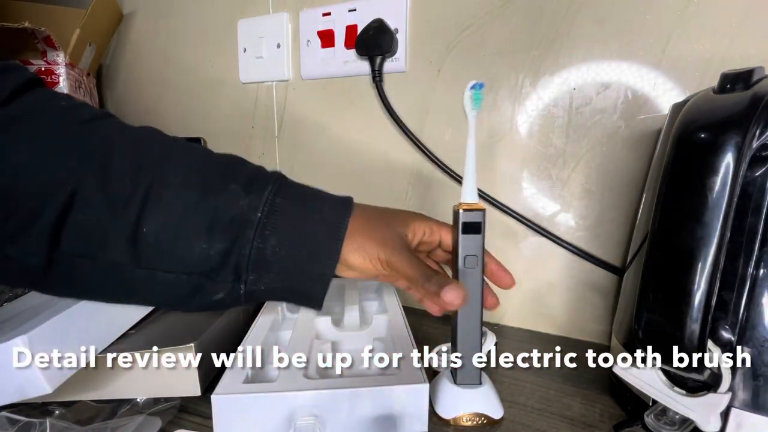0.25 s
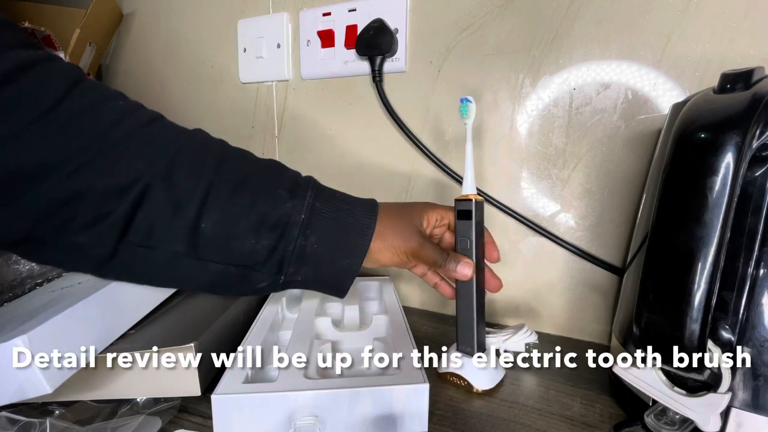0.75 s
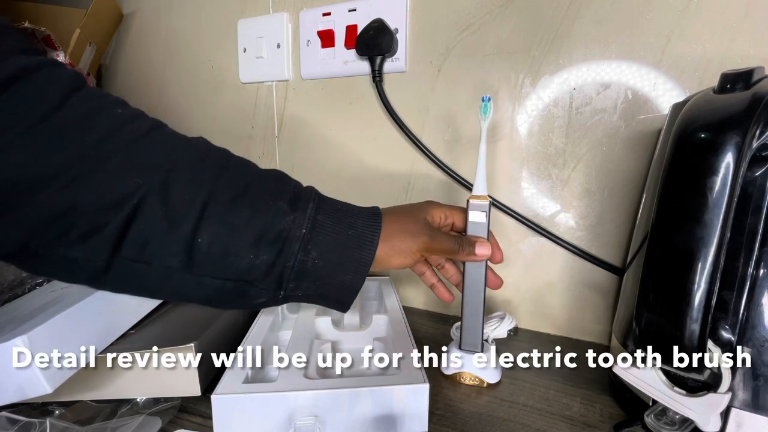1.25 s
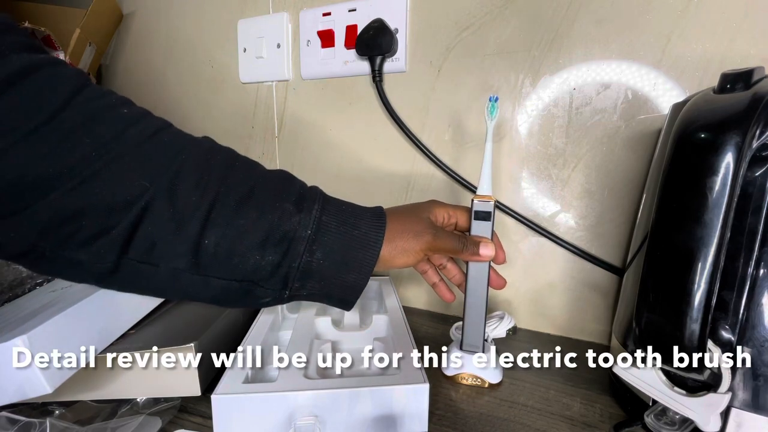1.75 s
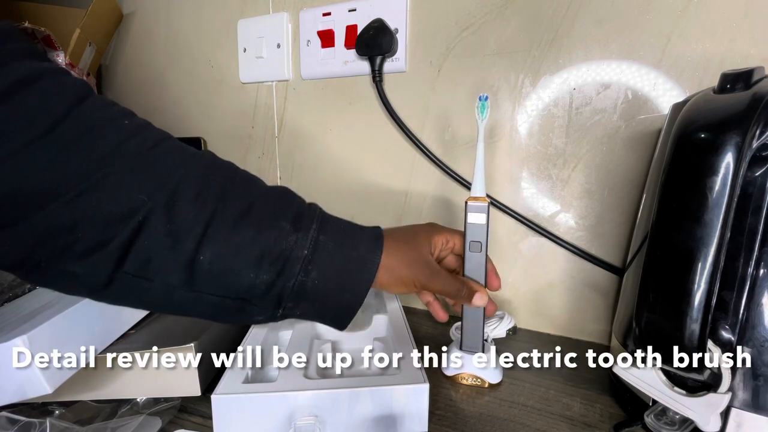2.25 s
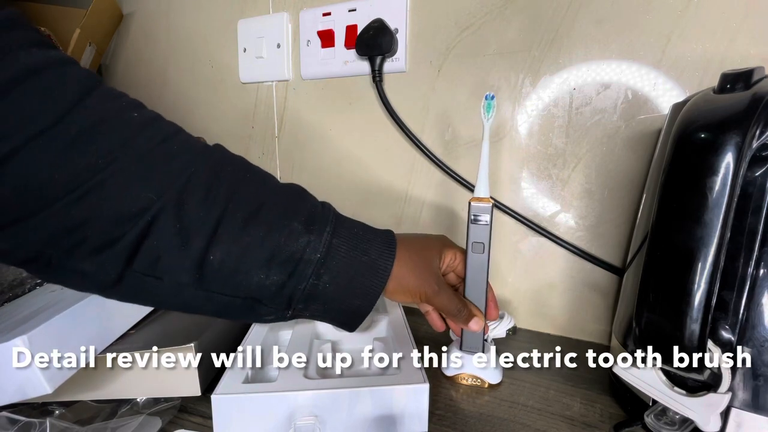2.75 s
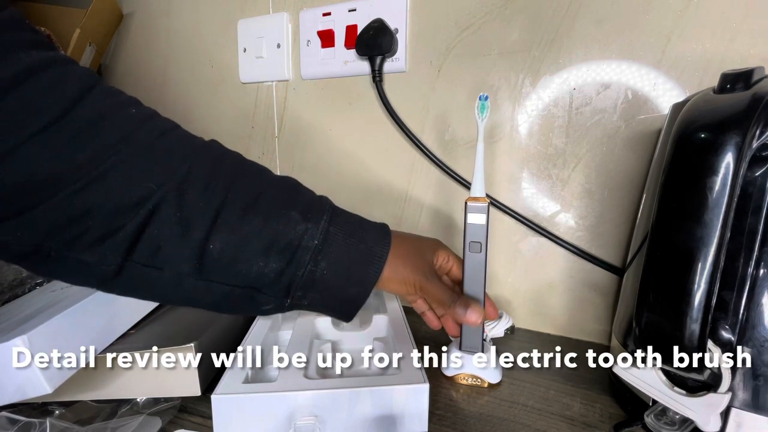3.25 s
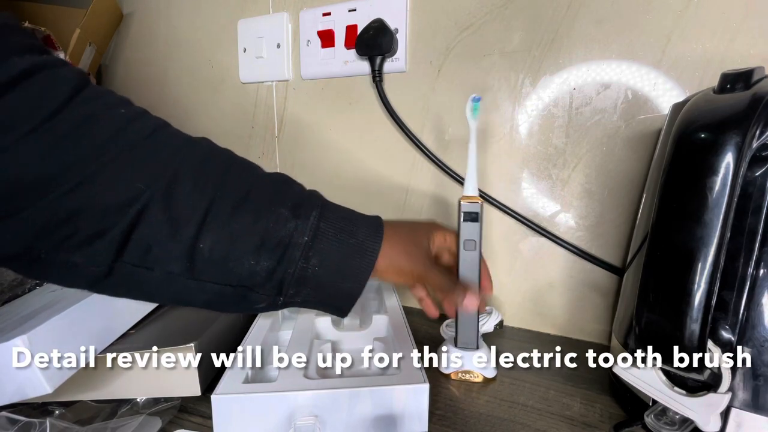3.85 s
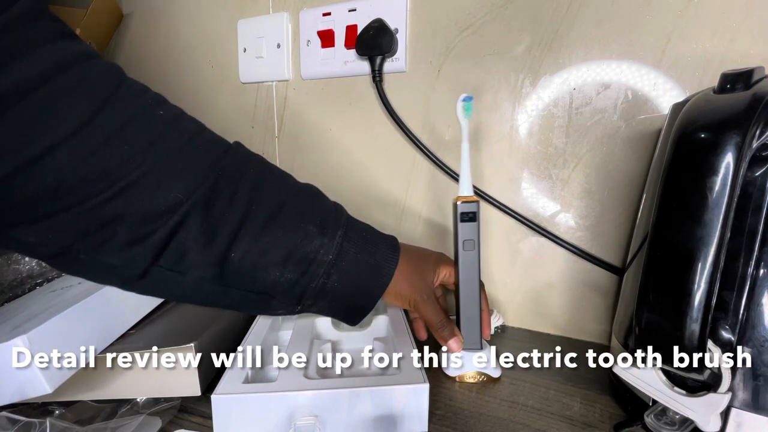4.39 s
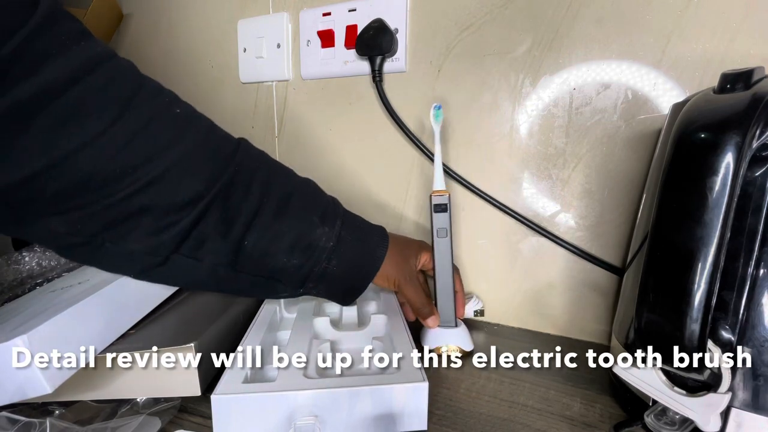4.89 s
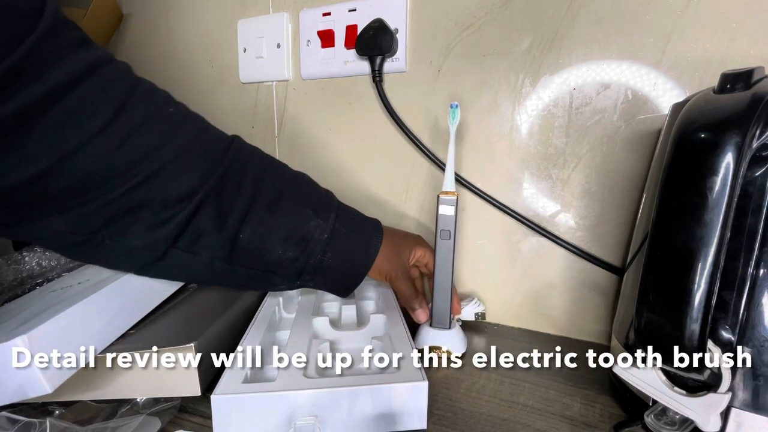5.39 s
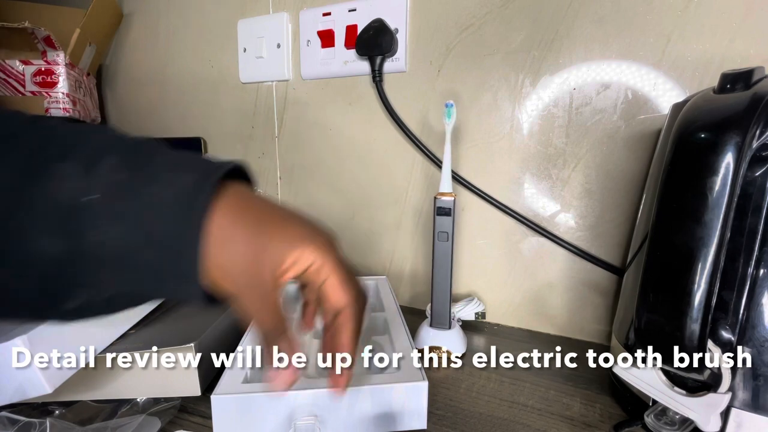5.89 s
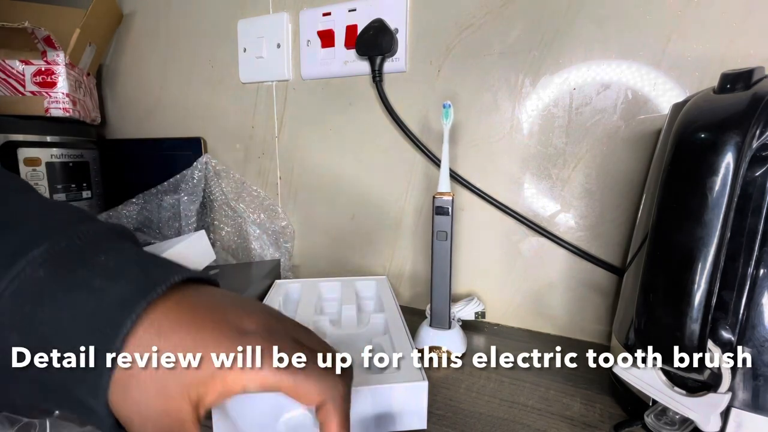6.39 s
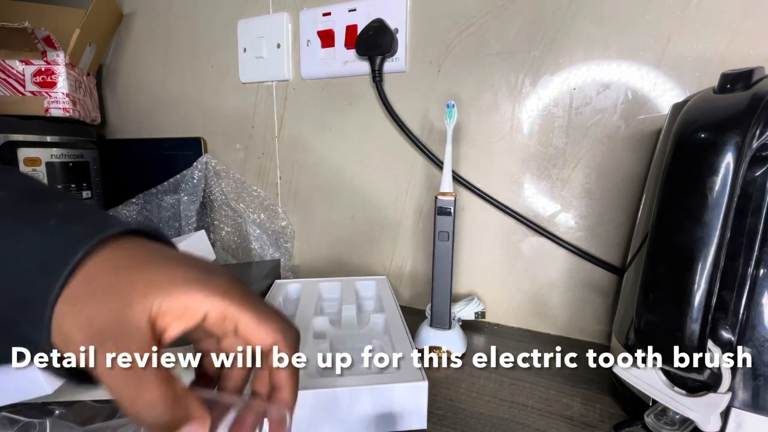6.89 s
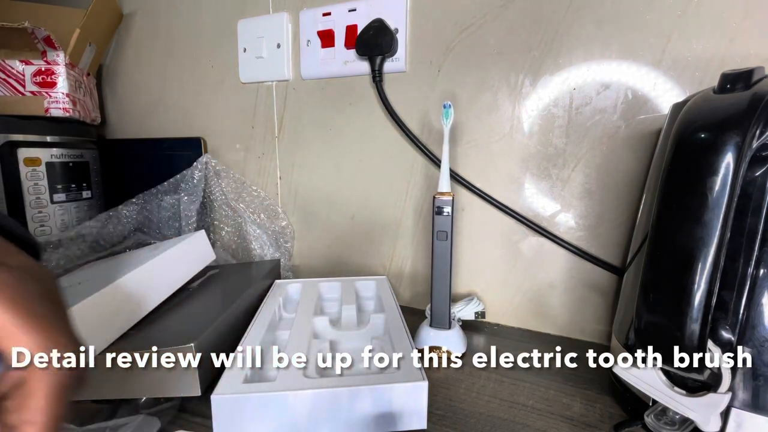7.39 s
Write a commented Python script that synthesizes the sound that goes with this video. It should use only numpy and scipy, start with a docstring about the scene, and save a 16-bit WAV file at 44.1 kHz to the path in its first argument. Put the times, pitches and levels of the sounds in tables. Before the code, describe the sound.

Close, dry stereo phone pickup on a kitchen counter. Muffled plastic taps come in an opening flurry, thin out to sparse touches, then return as a firmer cluster with a woody thud and a scrape. After light bumps, a brief squeaky creak leads to a crisp snap on the left, a hard drop and rapid small bounces, ending in bright, crinkly packaging rustle over a faint room murmur.

```python
"""On a hollow kitchen counter in a quiet room, the plastic base of an electric toothbrush knocks and slides:
blows and friction excite damped modes of the counter, and fingers hiss over smooth plastic.
A stiff lid creaks by stick-slip and snaps; a small hard piece drops and bounces in a moulded tray
while packaging rustles. Bounces and snaps are decaying modes with noise cracks.
The two ports of a phone on the counter receive them at differing phase and level."""
import sys
import numpy as np
from scipy import signal
from scipy.fft import rfft, irfft
from scipy.io import wavfile
from scipy.ndimage import uniform_filter1d

SR = 44100
rng = np.random.default_rng(int(sys.argv[2]) if len(sys.argv) > 2 else 0)


def transcribe(signal):
    """Save signal, clipped to [-1, 1], as a 16-bit WAV file at the path in sys.argv[1]."""
    frames = np.atleast_2d(signal).T
    limited = np.clip(frames, -1, 1)
    pcm = np.round(limited * 32767).astype(np.int16)
    wavfile.write(sys.argv[1], SR, pcm)


N = 336924  # samples


def amp(db):
    """Level law: decibels to amplitude ratio."""
    return 10 ** (np.asarray(db) / 20)


def curve(table):
    """Linear interpolation in time: each column of a (seconds, ..) table, one value per sample."""
    s, *columns = np.transpose(table)
    return [np.interp(np.arange(N) / SR, s, c) for c in columns]


def across(hz, at_hz, values):
    """Spectral envelope: values joined by straight lines on a log-frequency axis."""
    return np.interp(np.log(np.maximum(hz, 1)), np.log(at_hz), values)


def hiss(size, at_hz, db, alike_hz):
    """Partly coherent coloured noise, rms 1: the two ports agree well below alike_hz and differ above."""
    hz = np.arange(size // 2 + 1) * SR / size
    mid, side = rfft(rng.standard_normal((2, size))) * amp(across(hz, at_hz, db))
    apart = np.sqrt(1 / (1 + (alike_hz / np.maximum(hz, 1)) ** 2))
    pair = irfft([mid + apart * side, mid - apart * side], size)
    return pair / np.sqrt(np.mean(pair ** 2))


def walk(rate):
    """Random modulation: normal values held for 1 / rate seconds, then smoothed over as long."""
    hold = int(SR / rate)
    return uniform_filter1d(np.repeat(rng.standard_normal(N // hold + 1), hold), hold)[:N]


def ring(modes, times, gains_db, rise_s, alike_hz, steady=0):
    """Modal superposition: each blow sets every damped mode ringing, after a contact build-up of rise_s.

    gains_db is blows x modes x ports; steady is a continuous force on all modes.
    """
    mode_waver = .008  # share of each mode's pitch
    out = np.zeros((2, N))
    at = (np.asarray(times) * SR).astype(int)
    chance = rng.standard_normal((len(at), len(modes), 2))
    for k, (hz, db, t60) in enumerate(modes):
        # treble modes radiate unevenly towards the two ports
        turn = min(hz / alike_hz, 3) * chance[:, k, 0]
        phase = np.exp(.5j * np.array([turn, -turn]))
        push = np.zeros((2, N), complex) + steady
        push[:, at] += amp(gains_db[:, k].T + 2.05 * chance[:, k, 1]) * phase
        spin = np.exp(2j * np.pi * hz / SR)
        quick = np.exp(-1 / (rise_s * SR))
        slow = np.exp(-np.log(1000) / (t60 * SR))
        # a slight random waver roughens each mode's ringing
        waver = np.exp(2j * np.pi * hz * mode_waver * np.cumsum(walk(70)) / SR)
        ringing = signal.lfilter([1 - quick], np.poly([spin * slow, spin * quick]), push)
        out += amp(db) * (ringing * waver).imag
    return out


def bursts(times, at_hz, colours_db, pans_db, rise_s, crack_s, tail_s, tail_db, alike_hz, size=8192):
    """Impact noise and reflection: a ragged crack, then the duller wash that nearby walls send back."""
    out = np.zeros((2, N + size))
    t = np.arange(size) / SR
    hz = np.array([at_hz[0] / 6, *at_hz])
    for s, db, pan in zip(times, colours_db, pans_db):
        # the contact breaks and remakes
        chatter = amp(3 * np.repeat(rng.standard_normal(size // 64), 64))
        colour = np.array([db[0] - 21.5, *db])  # a small object radiates little bass
        balance = amp(np.array([[pan], [-pan]]) / 2)
        crack = balance * chatter * np.exp(-t / crack_s) * hiss(size, hz, colour, alike_hz)
        wash = amp(tail_db) * np.exp(-t / tail_s) * hiss(size, hz, colour - hz / 2300, alike_hz)
        first = int(s * SR)
        out[:, first:first + size] += amp(np.max(db)) * (1 - np.exp(-t / rise_s)) * (crack + wash)
    return out[:, :N]


def ports(pair, lead, pan=((1, 0),)):
    """Spatial cues: phase and level differences between the two ports, set by frequency."""
    hz = np.arange(N // 2 + 1) * SR / N
    half = np.exp(.5j * across(hz, *np.transpose(lead))) * amp(across(hz, *np.transpose(pan)) / 2)
    return irfft(rfft(pair) * [half, 1 / half], N)


def room():
    """Background noise: a slowly wavering murmur, slightly louder on the left."""
    # Colour of the murmur. Each row: frequency in Hz, relative density in dB per Hz.
    murmur_colour = [(15, -23.5), (25, -41), (49, 0), (70, -0.5), (349, -21.5), (422, -36), (1250, -68),
                     (1550, -54), (6210, -49), (13000, -56), (16500, -79.5)]
    level = amp(-61 + 1.9 * walk(4.893))
    return level * hiss(N, *np.transpose(murmur_colour), 300) * amp([[.9], [-.9]])


def counter():
    """Forced modal vibration: knocks, slides and rumble ring the counter; hardness feeds its upper modes."""
    # Base knocking on the counter. Each row: time in seconds, relative level in dB,
    # hardness (upper modes against the level) in dB.
    knocks = [(0.034, -35, -3.5), (0.063, -31, -6.5), (0.211, -30.5, -15), (0.334, -32, 4.5),
              (0.38, -28.5, -9.5), (0.481, -38.5, 10.5), (0.501, -26.5, 3), (0.528, -32, -2),
              (0.576, -32.5, 7.5), (0.595, -27.5, 0.5), (0.624, -24, -2), (0.878, -41.5, -13),
              (1.01, -51, 5.5), (1.04, -40.5, -5.5), (1.142, -55, 10), (1.154, -36, -3), (2.336, -28, -5.5),
              (2.476, -55.5, 14.5), (2.886, -37, -7), (3.108, -31, -47), (3.145, -38.5, -3),
              (3.418, -47.5, 6.5), (3.48, -52.5, 8.5), (3.525, -42.5, 3.5), (3.567, -19, 1.5),
              (3.645, -23, -19), (3.729, -8, -2), (3.882, -34, 2.5), (3.918, -54.5, 18), (3.983, -28.5, 3),
              (3.991, -47.5, 12.5), (4.007, -24.5, 3), (4.019, -23, -1.5), (4.091, -43, 6.5),
              (4.112, -23.5, 4.5), (4.123, -27, 2.5), (4.178, -21.5, -2), (4.376, -29, -7),
              (5.15, -64, 15.5), (5.269, -35.5, -6), (5.332, -39, 1.5), (5.438, -37, -0.5),
              (5.635, -32.5, 1), (5.732, -38.5, -6.5), (5.818, -35.5, -3.5), (5.863, -36, -5),
              (5.954, -53, 8.5), (5.977, -35, -6), (6.021, -34, -4.5), (6.395, -33, -10)]
    # Modes of the hollow counter. Each row: frequency in Hz, relative level in dB, 60 dB decay in seconds.
    counter_modes = [(61, -10.5, 0.055), (78.6, -12, 0.11), (111.7, -8, 0.16), (166.8, -1.5, 0.11),
                     (265.1, -8, 0.13), (333, -13.5, 0.095), (446, -14, 0.15), (663, -15.5, 0.16),
                     (985, -7, 0.098), (1300, -17, 0.058), (1667, -17.5, 0.038), (2140, -34.5, 0.029),
                     (2797, -24, 0.018)]
    # Levels of low rumble and of broad rustle; near 6.7 s the rustle is the wash of the bounces.
    # Each row: time in seconds, rumble drive in dB, relative rustle level in dB.
    rumble_and_rustle = [(0.0, -63.5, -67), (0.3, -72, -67.5), (0.51, -56, -74.5), (0.85, -73.5, -62),
                         (1.57, -91, -75), (2.13, -72, -69.5), (3.1, -74, -65.5), (3.4, -83, -80.5),
                         (3.7, -58.5, -64.5), (4.2, -58.5, -64), (4.6, -71, -59), (5.09, -79, -67.5),
                         (5.62, -81, -63.5), (5.87, -71, -69.5), (6.5, -72, -56.5), (6.72, -62, -47),
                         (7.02, -72, -52), (7.25, -72.5, -62), (7.64, -76, -59)]
    # Colour of the broad rustle. Each row: frequency in Hz, relative density in dB per Hz.
    rustle_colour = [(250, 8), (500, 8), (1000, 1.5), (1500, -5.5), (2050, -5), (3500, -14.5), (6000, -22)]
    # Colour of the knock's crack. One value per point: frequency in Hz.
    knock_hz = [400, 1500, 2700, 4200, 14000]
    # One value per point: crack against the knock's level in dB.
    knock_db = [-13.5, -32.5, -45.5, -51.5, -49.5]
    # One value per point: crack gain in dB per dB of hardness.
    knock_per_hard = [1.05, 1.7, 2, 2.2, 2.33]
    # Phase between the ports. Each row: frequency in Hz, lead of the left in radians.
    counter_lead = [(60, -0.5), (430, 1), (690, 0.74), (1120, -1.5), (1720, 0.5), (4650, 0.1), (8000, 0),
                    (12400, 9.5)]
    # Level between the ports. Each row: frequency in Hz, left minus right in dB.
    counter_pan = [(60, -5), (110, 7.5), (200, 0.5), (700, 2.5), (1290, 0), (2380, 2), (4400, 9), (8120, 2)]

    s, low_db, hard_db = np.transpose(knocks)
    hz = np.array(counter_modes)[:, 0]
    hard_share = across(hz, [350, 1000, 2800], [0, 1.4, 2.2])
    mode_db = low_db[:, None] + np.outer(hard_db, hard_share)
    rumble_db, rustle_db = curve(rumble_and_rustle)
    # soft contact passes mainly bass, and the rumble comes in jerks
    soft = signal.lfilter(*signal.butter(2, 260, fs=SR), rng.standard_normal(N))
    jerks = amp(2.5 * walk(25))
    rubs, drive = slides()
    # sliding stirs the 1 kHz mode less
    slide_push = signal.lfilter(*signal.iirnotch(990, 15, SR), drive)
    push = amp(rumble_db) * jerks * soft + slide_push
    body = ring(counter_modes, s, mode_db[..., None] + np.zeros(2), 0.002, 1280, steady=push)
    flutter = amp(2.2 * walk(45))
    rustle = amp(rustle_db) * flutter * hiss(N, *np.transpose(rustle_colour), 270)
    crack_db = low_db[:, None] + knock_db + np.outer(hard_db, knock_per_hard)
    crack = bursts(s, knock_hz, crack_db, 0 * s, 0.00021, 0.0036, 0.025, -5.5, 970)
    return ports(amp(-8.5) * body + crack + rustle + rubs, counter_lead, counter_pan)


def slides():
    """Friction noise: swelling grains of band noise, returned with their push on the counter."""
    # Single slides of base or tray, and a bright packaging rustle at 7.1 s. Each row: start in seconds,
    # end in seconds, relative level in dB, centre in Hz, drive of the counter's modes against the level in dB.
    slide_rows = [(0.382, 0.643, -61, 2320, -14.5), (0.833, 0.939, -63, 1720, -18),
                  (3.509, 3.612, -57, 1460, -19), (4.23, 4.497, -66, 1920, -12),
                  (4.495, 4.638, -51.5, 1430, -7.5), (4.6, 4.724, -59.5, 1500, -15),
                  (6.186, 6.289, -52.5, 840, -22.5), (7.106, 7.36, -57.5, 5470, -24),
                  (7.297, 7.644, -70, 3740, -15)]
    band_points = 0.88 * np.array([-8.5, 0.6, 1.18, 2.0])  # octaves from the centre
    out = np.zeros((2, 2, N))
    for start, end, db, hz, drive_db in slide_rows:
        first = int(start * SR)
        size = int((min(end, N / SR) - start) * SR)
        # a power under 1 brings the peak of the swell early
        swell = np.sin(np.pi * np.linspace(0, 1, size) ** .75) ** 0.99
        grains = amp(db + 3 * walk(400)[:size]) * swell
        rub = grains * hiss(size, hz * 2 ** band_points, [3.5, 9.5, -3.0, -20.5], 530)
        out[:, :, first:first + size] += [rub, amp(drive_db) * rub]
    return out


def skin():
    """Sliding friction of fingers on smooth plastic: an uneven fine hiss with quick starts and stops."""
    # Strokes. Each row: start in seconds, end in seconds, relative level in dB.
    strokes = [(0.386, 0.635, -69), (.82, 0.905, -74.5), (0.957, 1.02, -70.5), (2.046, 2.238, -66.5),
               (2.335, 2.41, -59), (3.137, 3.164, -56.5), (3.365, 3.57, -71.5), (3.695, 3.732, -63),
               (3.83, 3.938, -65), (3.98, 4.05, -72), (4.076, 4.152, -73), (4.237, 4.311, -65),
               (4.51, 4.7, -68.5), (5.167, 5.193, -58), (6.187, 6.21, -57), (6.304, 6.326, -57),
               (7.117, 7.166, -48.5), (7.175, 7.367, -63)]
    # Colour of the hiss. Each row: frequency in Hz, relative density in dB per Hz.
    skin_colour = [(2500, 1), (4500, 0.5), (8000, 4.5), (11000, 14), (14500, 9), (16500, 5)]
    t = np.arange(N) / SR
    gain = sum(amp(db) * ((t > start) & (t < end)) for start, end, db in strokes)
    flutter = amp(1.5 * walk(54))
    return uniform_filter1d(gain, size=700) * flutter * hiss(N, *np.transpose(skin_colour), 3000)


def lid():
    """Release of elastic strain: the bent lid creaks, and its snaps ring clear modes with a faint crack."""
    # Lid flexing, then snapping free. Each row: time in seconds, relative level in dB,
    # left minus right in dB.
    snaps = [(6.065, -52, 2), (6.395, -61.5, 12), (6.4718, -18.5, 8.5)]
    # Modes of the lid. Each row: frequency in Hz, relative level in dB, 60 dB decay in seconds.
    lid_modes = [(1060, -16, 0.07), (2080, -13.5, 0.082), (2592, -1.5, 0.061), (3480, -1.5, 0.051),
                 (3930, -5.5, 0.03), (4470, -7, 0.028), (6070, -6, 0.03), (6790, -12.5, 0.027),
                 (8500, -18.5, 0.069), (10050, -6.5, 0.012), (13500, -8.5, 0.024)]
    s, db, pan = np.transpose(snaps)
    balance = np.transpose([pan, -pan])[:, None] / 2
    gains = db[:, None, None] + np.zeros((1, len(lid_modes), 1)) + balance
    crack = bursts(s, [2000, 14000], db[:, None] + [-13, -19], pan, 0.00033, 0.013, 0.11, -16.5, 3000)
    return amp(2.0) * ring(lid_modes, s, gains, 0.00027, 4000) + crack + creaks()


def creaks():
    """Fast stick-slip oscillation: a rough, wavering tone with two weak overtones swells and fades."""
    # Creaks of the bent lid. Each row: start in seconds, loudest moment in seconds, end in seconds,
    # relative level in dB, mean pitch in Hz.
    creak_rows = [(6.19, 6.205, 6.27, -52, 1110), (6.235, 6.315, 6.385, -49, 2850),
                  (6.435, 6.457, 6.49, -46, 1112)]
    fade_db, overtone_db = -27, -22
    waver, rough_db = .045, 4.5  # waver as a share of the pitch
    t = np.arange(N) / SR
    out = 0
    for start, loudest, end, db, hz in creak_rows:
        turn = 2 * np.pi * np.cumsum(hz * (1 + waver * walk(700))) / SR
        swell = np.interp(t, [start, loudest, end], [fade_db, 0, fade_db], -120, -120)
        tone = np.sin(turn) + amp(overtone_db) * (np.sin(2 * turn) + np.sin(3 * turn))
        out = out + amp(db + swell + rough_db * walk(460)) * tone
    return out


def piece():
    """Modal excitation by impact: each bounce has its own mix of modes, a crack off the tray and a wash."""
    # Piece striking the tray. Each row: time in seconds, relative level in dB, dullness in dB,
    # 8 kHz ring and 2.5 kHz ring against the level in dB, left minus right in dB.
    taps = [(6.194, -46.5, -1.5, -21, 3, 1.1), (6.5987, -13, -1.5, -9.5, -3, 5.1),
            (6.6516, -32, 11, -15.5, -14.5, 3.3), (6.726, -18.5, 0.5, -9, -3, 7.2),
            (6.808, -18.5, -1, 0.5, -7.5, 9.2), (6.86, -20, 1.5, 6.5, -2, 6.3),
            (6.8918, -27, -1.5, 1.5, 2.5, 9.3), (6.924, -31, 1.5, -15, 6, 9.3),
            (6.9344, -29, 5.5, 3, 5, 4.6), (6.95, -36, 1.5, -19, -3, 4.8),
            (6.9686, -33, 4.5, 7.5, -2.5, 1.5), (6.9792, -28.5, 4, -15.5, 4, 4.9),
            (7.006, -42, 12, -18, 6, 4.1), (7.234, -52.5, -1, -5, -10, 5.6)]
    # Modes of the piece. Each row: frequency in Hz, relative level in dB, 60 dB decay in seconds.
    piece_modes = [(176.4, -33.5, 0.12), (300, -37.5, 0.073), (409, -25, 0.16), (616, -19, 0.039),
                   (850, -21, 0.12), (1315, -20, 0.12), (2207, -16, 0.084), (2495, -11, 0.096),
                   (2560, -13, 0.1), (3000, -1.5, 0.012), (3706, -7.5, 0.036), (3943, 0, 0.014),
                   (4975, -8, 0.039), (6380, -8.5, 0.061), (8160, -8, 0.078), (8150, -8.5, 0.13),
                   (13800, 5, 0.0057)]
    # Colour of a blow. Each row: frequency in Hz, relative level in dB, dB per dB of dullness,
    # share of the 8 kHz ring.
    tap_colour = [(730, 2.5, 1.3, 0.029), (2600, 1.5, 1.59, 0.28), (3640, -0.5, 0, 0.039),
                  (9000, -2.5, 0, 0.64), (11000, -18.5, 4, 1), (13900, -11.5, 1.3, 0.54)]
    s, db, dull, high, middle, pan = np.transpose(taps)
    at_hz, base_db, per_dull, per_high = np.transpose(tap_colour)
    colour = db[:, None] + base_db + np.outer(dull, per_dull) + np.outer(high, per_high)
    hz = np.array(piece_modes)[:, 0]
    near = np.abs(hz - 2540) < 150  # the 2.5 kHz pair
    mode_db = np.array([across(hz, at_hz, c) for c in colour]) + np.outer(middle, near)
    gains = mode_db[..., None] + np.transpose([pan, -pan])[:, None] / 2
    crack_db = colour - 1.52 * dull[:, None]  # dull blows crack less
    cracks = bursts(s, at_hz, crack_db, pan, 0.00063, 0.0045, 0.029, -12.5, 3000)
    return amp(1.54) * ring(piece_modes, s, gains, 0.00042, 4000) + cracks


def scene():
    """Superposition: all sources add over the room's murmur."""
    # Phase of lid and piece between the ports. Each row: frequency in Hz, lead of the left in radians.
    tray_lead = [(200, -0.5), (1030, -2), (1810, -2), (2580, -2.5), (4050, 2.5), (6630, -2), (8180, 3),
                 (12200, 3)]
    return room() + counter() + skin() + ports(lid() + piece(), tray_lead)


def record(dry):
    """Linear filtering: less deep bass and top, a dip near 11 kHz, nearly mono above 12 kHz."""
    mid, side = (dry[0] + dry[1]) / 2, (dry[0] - dry[1]) / 2
    side = signal.sosfiltfilt(signal.butter(4, 11800, fs=SR, output="sos"), side)
    pair = signal.lfilter(*signal.butter(2, 50, "high", fs=SR), np.array([mid + side, mid - side]))
    dip = signal.lfilter(*signal.iirpeak(11000, 5.0, SR), pair)
    top_cut = signal.ellip(10, .2, 80, 16200, fs=SR, output="sos")
    return signal.sosfilt(top_cut, pair - 0.69 * dip)


dry = scene()
out = record(dry)
transcribe(out)
```